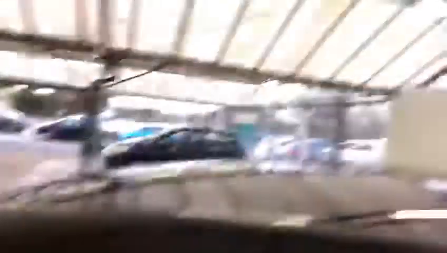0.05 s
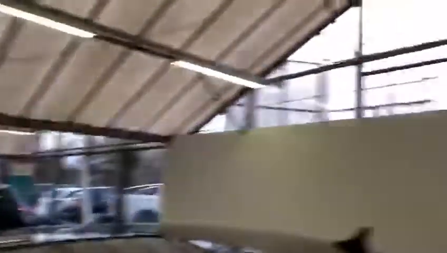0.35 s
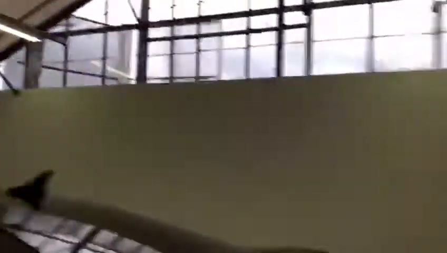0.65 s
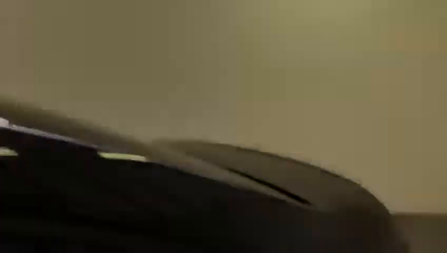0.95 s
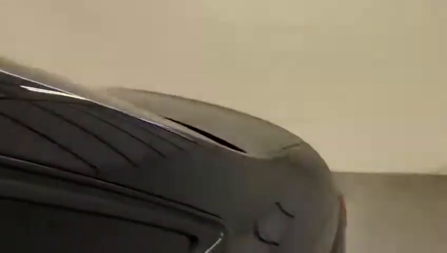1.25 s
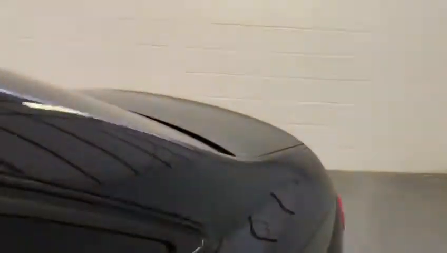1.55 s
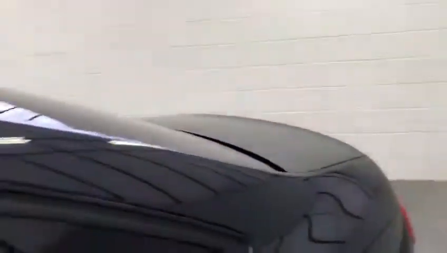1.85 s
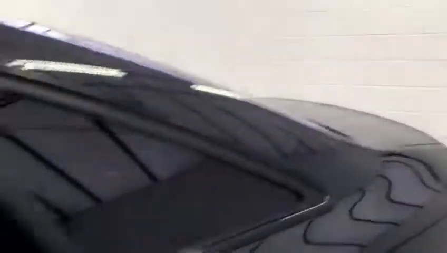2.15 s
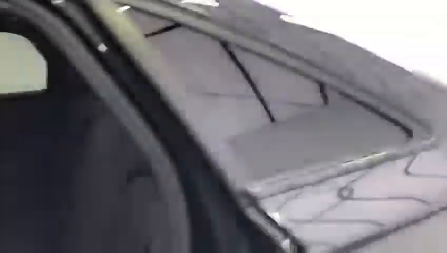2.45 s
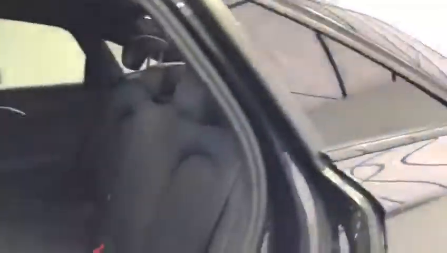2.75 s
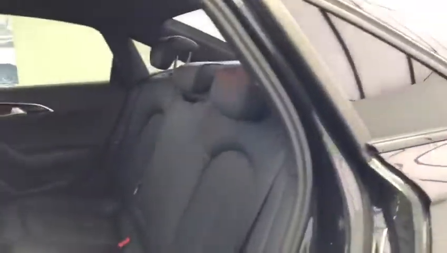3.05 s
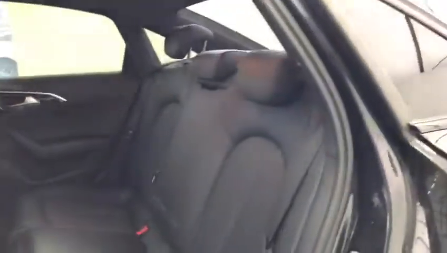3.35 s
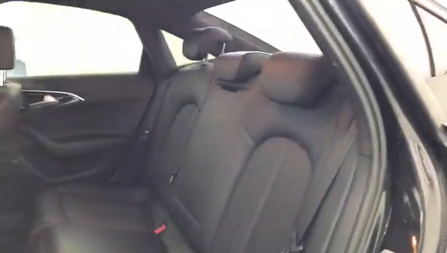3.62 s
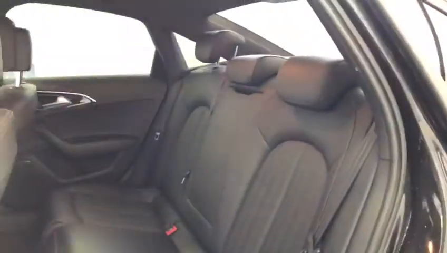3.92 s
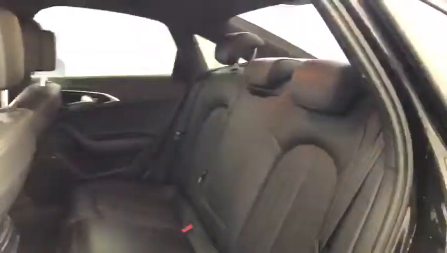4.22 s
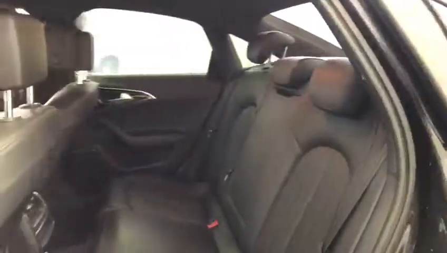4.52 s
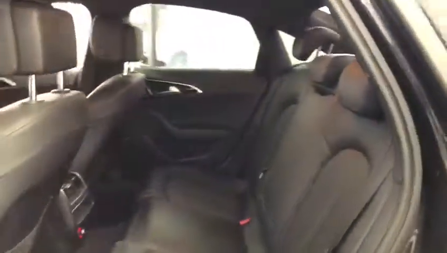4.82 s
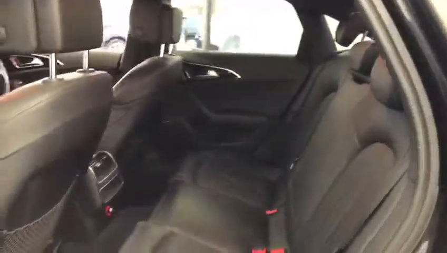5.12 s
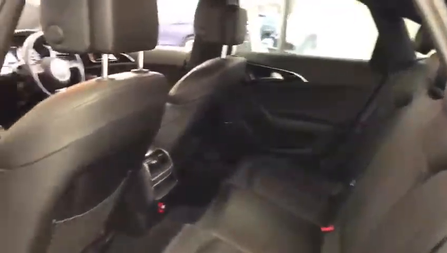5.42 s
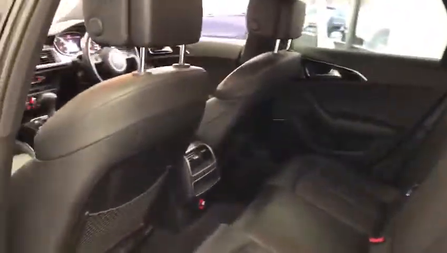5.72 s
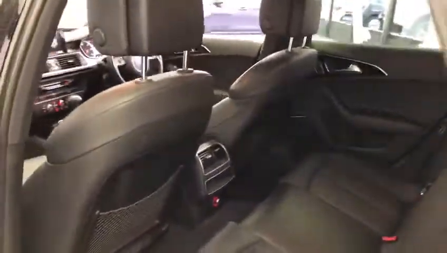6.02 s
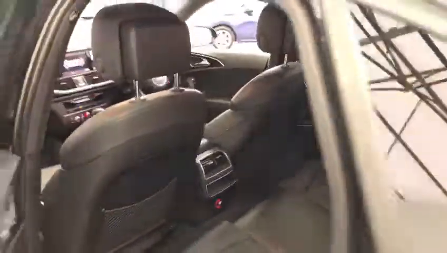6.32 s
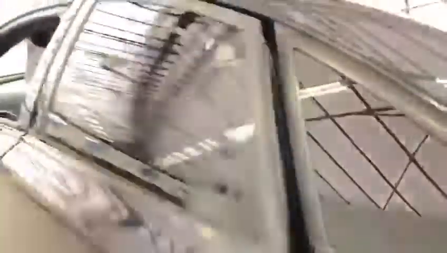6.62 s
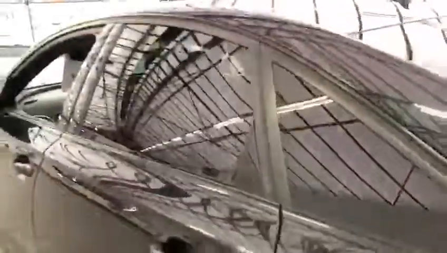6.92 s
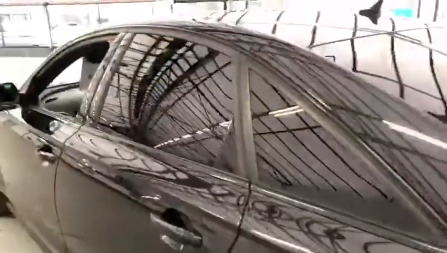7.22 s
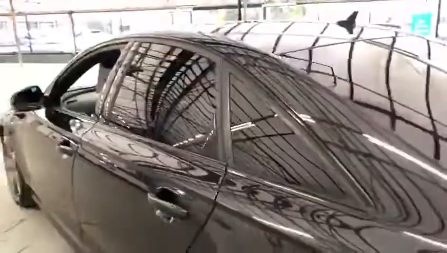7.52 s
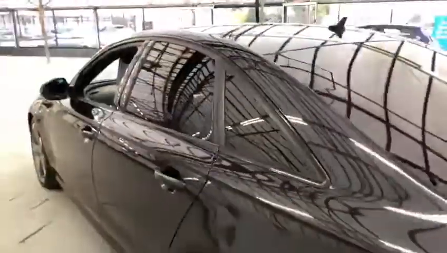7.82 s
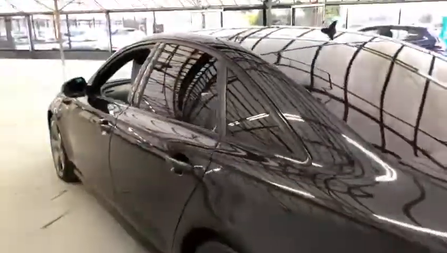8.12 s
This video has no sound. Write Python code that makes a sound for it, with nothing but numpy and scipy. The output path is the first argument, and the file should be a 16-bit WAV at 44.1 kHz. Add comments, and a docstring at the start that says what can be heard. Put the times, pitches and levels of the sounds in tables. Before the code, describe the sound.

A car idles with a steady hum in a large hall; one door thuds shut a little way off, another slams loudly close by.

```python
"""A large showroom, heard by someone walking round an idling car. A door thuds shut a little way
off, the rear door is unlatched and swung open, and later it is slammed close by. Each slam drives
damped modes of panel and cabin, shakes the trim and rings a steel latch; handle and sleeve tick,
bump and brush. The engine sounds harmonics of its crankshaft speed over a rush of noise and the
whirr of its belts. The hall answers the impacts with a late, soft tail."""
import sys
import numpy as np
from scipy import signal
from scipy.fft import rfft, irfft, next_fast_len
from scipy.io import wavfile

SR = 44100
rng = np.random.default_rng(int(sys.argv[2]) if len(sys.argv) > 2 else 0)


def waveform_to_disk(signal):
    """Save audio, clipped to [-1, 1], as 16-bit WAV at the path in sys.argv[1]."""
    frames = np.transpose(np.atleast_2d(signal))
    scaled = np.clip(frames, -1, 1) * 32767
    samples = np.round(scaled).astype(np.int16)
    wavfile.write(sys.argv[1], SR, samples)


N = 369116
T = np.arange(N) / SR
DOORWAY_S, DOORWAY_WIDTH_S = 3.91, 0.58  # the walk passes the open door


# Modes of the near door and cabin. Each row: frequency in Hz, relative level in dB, T60 in seconds.
NEAR_DOOR_MODES = [(72, -0.5, 0.21), (82, -11, 0.16), (102, -6.5, 0.2), (114.7, -10, 0.24),
                   (158.4, -8, .22), (208.4, -14, 0.24), (244, -10, .17), (280, -11.5, 0.16),
                   (320, -13.5, 0.15), (365, -15, 0.2), (450, -22.5, 0.25), (533, -31, .15),
                   (577, -18.5, 0.2), (648, -13.5, 0.14), (671, -16, 0.19), (800, -23, .15),
                   (871, -19, 0.13), (1260, -32, 0.22), (1870, -21, 0.093), (2910, -34, 0.13),
                   (3010, -28, 0.14), (4345, -40, .14), (4818, -32, 0.07)]
# Modes of the farther door. Each row: frequency in Hz, relative level in dB, T60 in seconds.
FAR_DOOR_MODES = [(68, -11, 0.18), (89, -5, .2), (132, 1, 0.21), (217, 1, 0.13), (268, -3.5, 0.16),
                  (343, -7, 0.13), (403, -9.5, .15), (582, -4.5, 0.16), (619, -6.5, 0.23), (784, -14, 0.15),
                  (1003, -3, 0.066)]
# Shudder of trim and panels. Each row: frequency in Hz, relative level in dB, T60 in seconds.
SHUDDER_BANDS = [(30, -23, .2), (110, 4, 0.32), (300, 0, 0.28), (700, -2, 0.22), (1010, -9, 0.21),
                 (1650, -17, 0.3), (3180, -21.5, 0.38), (5000, -33.5, 0.44), (10500, -37, 0.2),
                 (12000, -46, .2)]

def slam(start, modes, boom_db, boom_rise_s, shudder_db, shudder_rise_s):
    """Damped modal vibration: the seal cushions the blow, so the boom swells; the trim shudders."""
    out, t = np.zeros((2, N)), T[:SR]
    boom = sum(damped_sine(*mode) for mode in modes)
    shudder = decaying_noise(SHUDDER_BANDS)[:SR]
    add(out[0], start, -gain_of(boom_db) * boom * rise(t, boom_rise_s))
    add(out[1], start, gain_of(shudder_db) * shudder * rise(t, shudder_rise_s))
    return out


# Resonances of the steel latch. Each row: frequency in Hz, width in Hz, relative level in dB.
LATCH_MODES = [(313, 89, 5), (726, 163, 4), (1370, 190, -8), (1690, 170, -2), (2100, 140, -3.5),
               (2870, 160, -10.5), (3480, 180, -9), (4330, 120, -13), (5400, 520, -21), (7360, 2400, -25),
               (8730, 330, -23), (10000, 600, -25)]

def latch_contact(t60, tilt_db, ring_share=0.44):
    """Impact excitation: metal on metal cracks, rings the latch's resonances and rattles in them."""
    t = T[:16384]
    modes = [(hz, width, gain_of(db + tilt_db * np.log2(hz))) for hz, width, db in LATCH_MODES]
    steel = lambda f: np.sqrt(sum(g ** 2 / (1 + ((f - hz) / width) ** 4) for hz, width, g in modes))
    rattle = noise(steel, len(t)) * fade(t60)
    ring = sum((-1) ** k * g * width * np.sin(2 * np.pi * hz * t) * np.exp(-np.pi * width * t)
               for k, (hz, width, g) in enumerate(modes))
    ring *= np.linalg.norm(rattle) / np.linalg.norm(ring)  # equal energy
    crack = gain_of(-11.5) * noise(band(hz=2300, octaves=1), len(t)) * fade(t60=0.016)
    contact = ring_share * ring + np.sqrt(1 - ring_share ** 2) * rattle + crack
    return contact * rise(t, seconds=0.00063)  # the click's onset is slightly softened


# A lock meets its striker, duller farther off. Each row: time in seconds, gain in dB,
# tilt in dB per octave.
LOCK_STRIKES = [(1.4615, -26.5, -1.8), (6.7034, -3, 0)]
# First catch, strike and pawl. Each row: offset from the strike in seconds, relative level in dB,
# T60 in seconds, added tilt in dB per octave.
CLOSING_STAGES = [(-.011, -23, .14, -2), (0, 1, .028, -0.35), (.022, -16, 0.059, 2.5)]

def latches(bounces=3, bounce_s=0.0016, bounce_db=-3):
    """Contact bounce: each stage of a closing lock chatters in quick, weakening impacts."""
    out = np.zeros(N)
    for start, db, lock_tilt in LOCK_STRIKES:
        for offset, stage_db, t60, stage_tilt in CLOSING_STAGES:
            for k in range(bounces):
                contact = latch_contact(t60, stage_tilt + lock_tilt)
                add(out, start + offset + k * bounce_s, gain_of(db + stage_db + k * bounce_db) * contact)
    return out


# Brief sags and surges of the idle. Each row: time in seconds, change of speed in Hz.
IDLE_HUNTS = [(2.65, -.14), (3.55, .21), (7.7, 0.11)]
# Engine hum. Each row: multiple of the crankshaft speed, base RMS level in dB.
HUM_ORDERS = [(1, -69), (4, -57.5), (6, -64.5), (7, -60), (10, -57.5), (11, -65), (12, -61.5), (13, -58),
              (15, -68.5), (18, -65), (21, -60)]
# Exhaust drone. Each row: multiple of the crankshaft speed, base RMS level in dB,
# dB gained per dB of standing wave, dB gained per dB of bay openness.
EXHAUST_ORDERS = [(2, -55.5, 0, -1.5), (3, -52, -0.3, -1.5), (5, -44.5, 0.8, 0), (9, -47.5, 1, -0.23)]
# The drone's standing waves along the walk. Each row: time in seconds, relative level in dB.
STANDING_WAVES = [(0, -0.2), (0.7, -1.4), (1.2, -5.5), (2.1, -8.5), (2.9, 1.5), (4.2, 3.5), (5.9, -0.3),
                  (6.4, -8.5), (7.2, -4.5), (7.8, 1.0), (8.37, 1.3)]
# How openly the engine bay is heard along the walk. Each row: time in seconds, relative level in dB.
BAY_OPENNESS = [(0, 1.1), (0.7, 1), (1.2, 0.45), (3.5, -2), (4.8, 0), (6.1, -0.6), (7.3, 4), (8.37, 3.5)]
# Spectra of rumble, fan and hiss. Each row: frequency in Hz, relative spectral density in dB.
RUMBLE_SPECTRUM = [(20, -18), (40, -11), (55, 0), (80, 0.5), (110, 0), (160, 2.5), (220, 1), (300, 0),
                   (360, 0.5), (420, -5.5), (600, -15), (1200, -41.5)]
FAN_SPECTRUM = [(200, -29), (450, 0), (600, 1), (720, 0), (1050, -0.5), (1400, -2.5), (1700, -5),
                (2000, -8), (2500, -16.5), (4000, -33), (8000, -55)]
HISS_SPECTRUM = [(1000, -15.5), (2000, 0), (2500, 1.5), (2950, 1), (3400, -3), (4000, -4), (5000, -9),
                 (6000, -13), (7000, -17.5), (9000, -20), (12000, -28)]

def engine(idle_hz=27.58, hunt_s=0.3, unsteady=0.42, flutter=0.067, throb=0.04):
    """Periodic excitation: harmonics of the crankshaft speed, and noise that pulses with the firing."""
    speed = idle_hz + sum(hz * passing(s, hunt_s) for s, hz in IDLE_HUNTS)
    angle = 2 * np.pi * np.cumsum(speed) / SR
    harmonic = lambda k: np.sqrt(2) * np.sin(k * angle + 2 * np.pi * rng.random())
    wave_db, bay_db = along_walk(STANDING_WAVES), along_walk(BAY_OPENNESS)
    hum = sum(gain_of(db) * harmonic(k) * (1 + unsteady * waver(hz=2.6)) for k, db in HUM_ORDERS)
    hum *= gain_of(3.5 * passing(0.4, width_s=0.84))  # stronger behind the car, at the tailpipe
    drone = np.zeros(N)
    for k, db, by_wave, by_bay in EXHAUST_ORDERS:
        level = gain_of(db + by_wave * wave_db + by_bay * bay_db)
        drone += level * harmonic(k) * (1 + flutter * waver(hz=4.1))
    firing = harmonic(3)
    rumble = gain_of(-45.5 + 0.08 * wave_db) * shaped_noise(RUMBLE_SPECTRUM)
    fan = gain_of(-46.5 + bay_db) * shaped_noise(FAN_SPECTRUM)
    hiss = gain_of(-54 + 0.34 * bay_db) * shaped_noise(HISS_SPECTRUM)
    return hum + drone + (rumble + fan + hiss) * (1 + throb * firing)


# Clicks of handle and fittings, and at 1.448 s the first catch of the farther door's lock. Each row: start in
# seconds, level in dB, centre in Hz.
CLICKS = [(1.141, -54, 7500), (1.4073, -45, 5970), (1.448, -33, 2440), (2.309, -44.5, 6000),
          (2.332, -51, 6000), (2.4285, -52, 5000), (2.6495, -46.5, 6500), (2.6733, -43, 2700)]
# Dull bumps of seal, door and hand. Each row: start and length in seconds, level in dB, centre in Hz.
SOFT_BUMPS = [(1.088, 0.075, -45, 597), (1.385, 0.21, -34, 198), (2.42, 0.18, -40, 174),
              (2.447, 0.068, -44, 447), (2.53, 0.046, -43.5, 750), (2.62, .105, -38.5, 65),
              (2.652, 0.063, -48, 1000), (2.76, 0.083, -39, 60)]
# Sleeve and hand brush close by. Each row: start and length in seconds, level in dB.
SLEEVE_BRUSHES = [(2.678, .25, -54.5), (7.217, .1, -48.5), (7.359, .14, -60)]

def handling():
    """Impact and friction: hard contacts start abruptly, soft bumps and rubbing swell and fade."""
    out = np.zeros(N)
    tick = fade(t60=0.021) + gain_of(-14) * fade(t60=0.36)  # the loose part rattles on
    for start, db, hz in CLICKS:
        add(out, start, gain_of(db) * tick * noise(band(hz, octaves=0.69), len(tick)))
    for start, length, db, hz in SOFT_BUMPS:
        add(out, start, gain_of(db) * stroke(length, hz, octaves=0.41))
    for start, length, db in SLEEVE_BRUSHES:
        add(out, start, gain_of(db) * stroke(length, hz=5430, octaves=0.7))
    return out


# Modes of a hand-held case. Each row: frequency in Hz, level in dB, T60 in seconds.
CASE_MODES = [(630, -25.5, 0.014), (3320, -22.5, 0.0013), (6570, -9.5, 0.00065)]

def case_snap(start=0.68):
    """Impulse response: one very short knock rings a heavily damped case."""
    out = np.zeros(N)
    add(out, start, sum(damped_sine(*mode) for mode in CASE_MODES))
    return out


# Whirr of belts, pulleys and pump. Each row: centre in Hz, half-width in Hz, base RMS level in dB.
WHIRR_BANDS = [(350.7, 12, -57), (572, 25, -65.5), (1140, 47, -68.5), (1416, 40, -61.5), (2150, 50, -69),
               (2920, 130, -64.5), (3515, 110, -67.5)]
# Partials of the electric whine. Each row: frequency in Hz, relative level in dB.
WHINE_PARTIALS = [(4005, 0.5), (5006, -12), (6012, -11)]

def auxiliaries(wander_db=1.7, bay_share=0.3):
    """Narrow-band noise has pitch: belts and pump whirr; a thin whine grows at the open door."""
    whirr = np.zeros(N)
    for hz, width, db in WHIRR_BANDS:
        resonance = lambda f: 1 / (1 + ((f - hz) / width) ** 2)
        whirr += gain_of(db + wander_db * waver(hz=1)) * noise(resonance)
    whine = sum(gain_of(db) * noise(band(hz, octaves=0.0011)) for hz, db in WHINE_PARTIALS)
    whine_db = -76 + 8 * passing(DOORWAY_S, DOORWAY_WIDTH_S)
    return gain_of(bay_share * along_walk(BAY_OPENNESS)) * whirr + gain_of(whine_db) * whine


def cabin():
    """Cavity resonance: the engine's hollow murmur inside the car escapes by the open rear door."""
    return gain_of(-48) * passing(DOORWAY_S, DOORWAY_WIDTH_S) * noise(band(hz=416, octaves=0.64))


# Reverberation of the hall. Each row: frequency in Hz, relative level in dB, T60 in seconds.
HALL_BANDS = [(40, -18, 0.55), (75, -13.5, 0.76), (150, -17.5, 0.99), (302, -11, 1.1), (700, -13.5, 1.6),
              (1800, -10, 1.4), (2920, -10.5, 2), (4950, -14.5, 1.3), (10000, -18, 0.45)]

def hall(sound, early_s=0.012, early_db=-6, late_s=0.085):
    """Reverberation: floor and near wall reflect thinly first, roof and far walls send the tail."""
    early = decaying_noise(HALL_BANDS)[:SR] * fade(t60=0.38, size=SR)
    late = decaying_noise(HALL_BANDS)
    response = np.zeros(2 * SR)
    add(response, early_s, gain_of(early_db) * early * rise(T[:SR], seconds=0.019))
    add(response, late_s, late * rise(T[:len(late)], seconds=0.03))
    return signal.fftconvolve(sound, response)[:N]


def gain_of(db):
    """Decibels to amplitude."""
    return 10 ** (np.asarray(db) / 20)


def add(mix, start, sound):
    """Superposition: adds a sound at a start time in seconds."""
    part = mix[round(start * SR):][:len(sound)]
    part += sound[:len(part)]


def read(table, hz, column=1):
    """Interpolation of a spectrum table on a log-frequency axis."""
    columns = np.transpose(table)
    return np.interp(np.log(hz + 1), np.log(columns[0] + 1), columns[column])


def along_walk(table):
    """Linear interpolation of a level over time."""
    return np.interp(T, *np.transpose(table))


def passing(moment, width_s):
    """A Gaussian rise to 1 and fall around a moment."""
    return np.exp(-((T - moment) / width_s) ** 2)


def rise(t, seconds):
    """Exponential approach to 1 with a given time constant."""
    return 1 - np.exp(-t / seconds)


def fade(t60, size=16384):
    """Exponential decay by 60 dB in t60 seconds."""
    return np.exp(-np.log(1000) * T[:size] / t60)


def damped_sine(hz, db, t60):
    """One second of a mode's free vibration."""
    return gain_of(db) * np.sin(2 * np.pi * hz * T[:SR]) * fade(t60, size=SR)


def band(hz, octaves):
    """A Gaussian spectrum on a log-frequency axis."""
    return lambda f: np.exp(-0.5 * (np.log2(f / hz) / octaves) ** 2)


def noise(colour, size=N):
    """Filtered noise of RMS 1 whose amplitude spectrum follows colour(Hz)."""
    n = next_fast_len(size)
    hz = np.fft.rfftfreq(n, 1 / SR) + 1
    coloured = irfft(rfft(rng.standard_normal(n)) * colour(hz), n)[:size]
    return coloured / np.sqrt(np.mean(coloured ** 2) + 1e-20)


def shaped_noise(spectrum):
    """Noise of RMS 1 coloured by a spectrum table."""
    return noise(lambda f: gain_of(read(spectrum, f)))


def waver(hz):
    """Slow random modulation: low-pass noise."""
    return noise(lambda f: np.exp(-(f / (hz + 1)) ** 2))


def stroke(length_s, hz, octaves):
    """Band noise that swells and fades under a Hann window."""
    swell = np.hanning(int(length_s * SR))
    return swell * noise(band(hz, octaves), len(swell))


def decaying_noise(bands, size=65536):
    """A diffuse response: dense random taps with a level and a decay time for each band."""
    hz, t, spectra = signal.stft(rng.choice([-1., 1.], size), SR, nperseg=512)
    level, t60 = gain_of(read(bands, hz))[:, None], read(bands, hz, column=2)[:, None]
    rate = np.log(1000) / t60
    decay = np.exp(-rate * t) * np.sqrt(2 * rate / SR)  # unit energy in each band
    return signal.istft(spectra * level * decay, SR, nperseg=512)[1]


def scene():
    """Superposition of the doors, the handling, their reverberation and the idling car."""
    far = slam(1.457, FAR_DOOR_MODES, boom_db=-22.5, boom_rise_s=0.0043,
               shudder_db=15.5, shudder_rise_s=0.0041)
    near = slam(6.7097, NEAR_DOOR_MODES, boom_db=2.5, boom_rise_s=0.01,
                shudder_db=32, shudder_rise_s=0.0056)
    boom, shudder = far + near
    locks, touches = latches(), handling() + case_snap()
    # only the large, low panel modes carry into the hall
    low_boom = signal.sosfilt(signal.butter(2, 960, fs=SR, output="sos"), boom)
    sent = gain_of(-3) * low_boom + gain_of(3.5) * shudder + gain_of(-6) * locks + gain_of(-17) * touches
    idling = engine() + auxiliaries() + cabin()
    return (boom + shudder + locks + touches + idling + hall(sent))[None]


def record(dry, ceiling=0.86, cutoff_hz=11780):
    """Soft saturation: the microphone rounds off the slam's peaks; a low-pass limits the band."""
    rounded = dry / (1 + (dry / ceiling) ** 6) ** (1 / 6)
    low_pass = signal.firwin(201, cutoff_hz, window=("kaiser", 9), fs=SR)
    return signal.oaconvolve(rounded, low_pass[None], "same")


dry = scene()
out = record(dry)
waveform_to_disk(out)
```